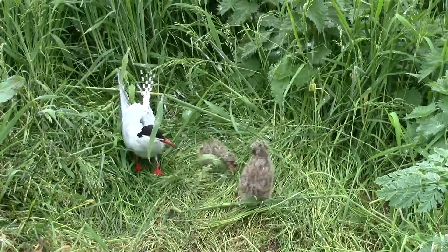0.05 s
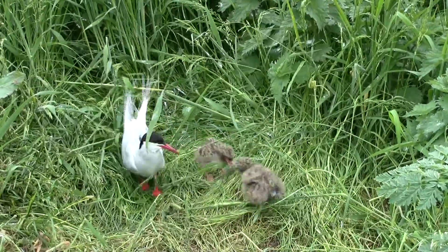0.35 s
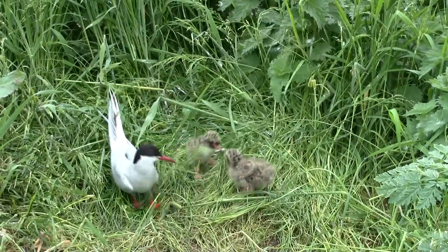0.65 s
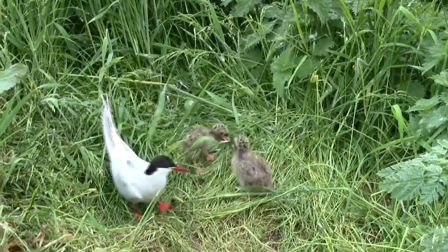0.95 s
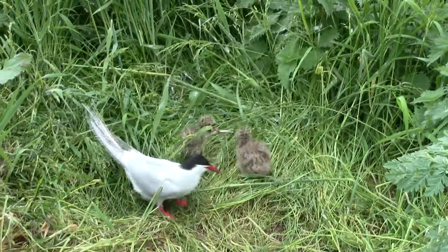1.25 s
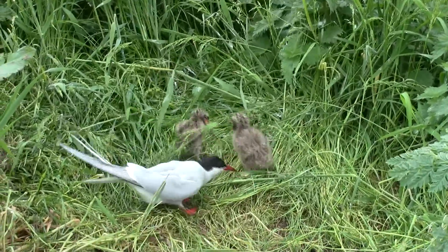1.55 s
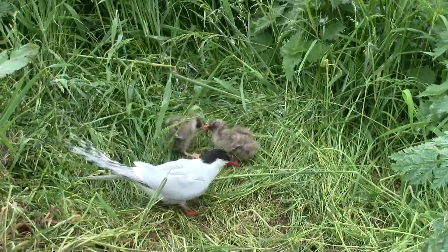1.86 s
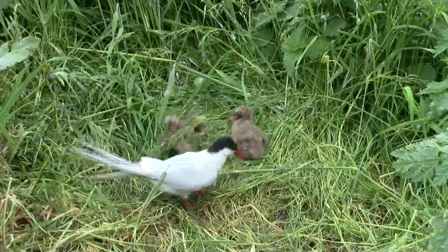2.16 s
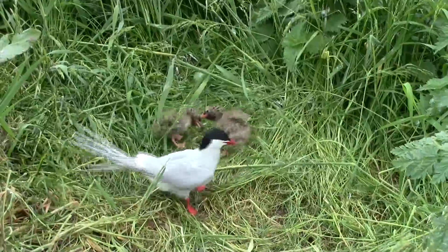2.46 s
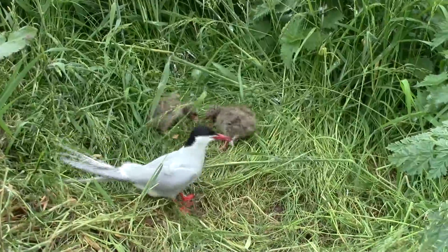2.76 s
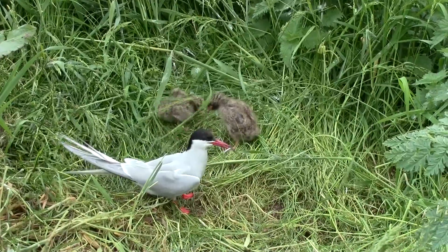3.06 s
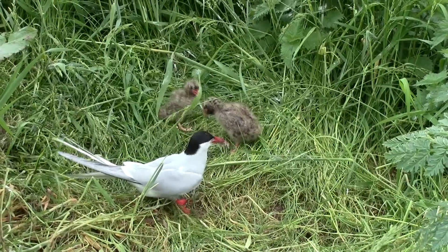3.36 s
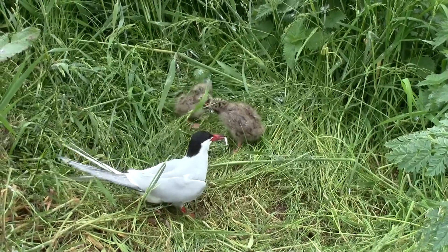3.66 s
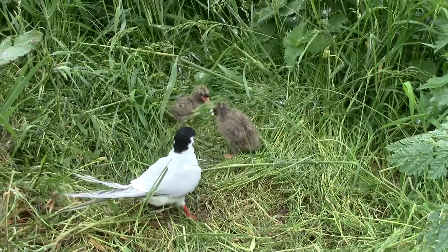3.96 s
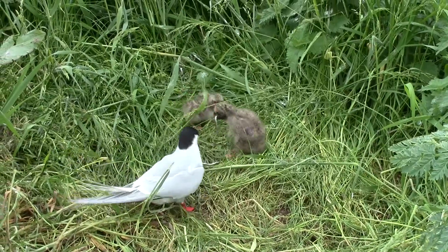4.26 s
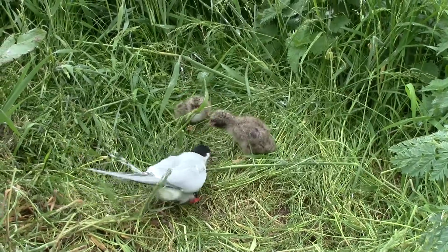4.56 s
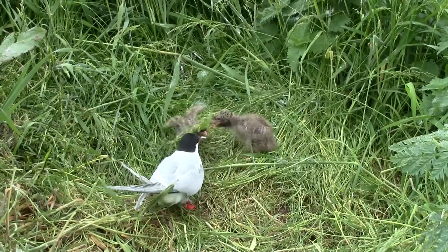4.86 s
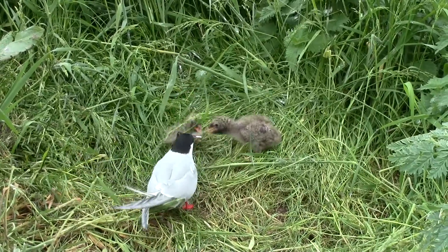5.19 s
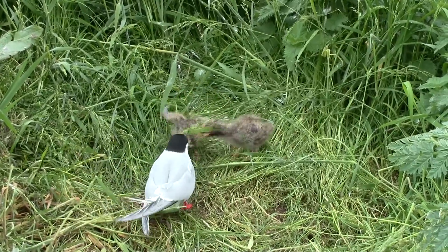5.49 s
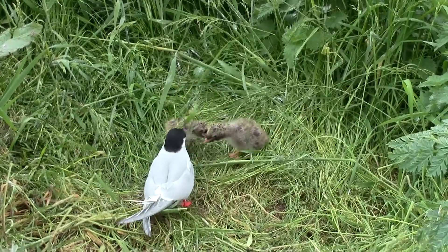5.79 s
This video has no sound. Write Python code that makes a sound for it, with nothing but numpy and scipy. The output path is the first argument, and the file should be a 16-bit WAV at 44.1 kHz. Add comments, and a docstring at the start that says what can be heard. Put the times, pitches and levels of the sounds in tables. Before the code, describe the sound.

A tern calls close to the microphone over the continuous, softer din of a colony, with distant whistles and rasps all around. It opens with a high fluttering cry that breaks into a rasp, then a short churr. A louder cry comes at 0.9 seconds. From 1.3 seconds a soft churr and a quick run of dry clicking notes build to a loud, harsh scream at 1.7 seconds. One more click and faint grass rustles follow, leaving the farther birds. Another loud, shrill cry rings out at 3 seconds, followed by a quieter churr and a slowing string of sharp clicks from 3.7 to 4.3 seconds. A faint low croak and a couple of soft thuds on turf surround a last churr near 4.8 seconds. Grass rustles briefly after 5 seconds as light wind rumble swells on the microphone, and distant calls continue until 6 seconds.

```python
"""A tern calls close to the microphone, standing by its chicks in the grass of a busy colony.
Near birds give fluttering whistles that break into a rasp as the syrinx membranes slap and ring the
throat, and runs of dry 'kek' notes; farther birds call all around. Grass rustles now and then, a light
wind rumbles on the microphone, and the camera's gain control ducks everything under each loud call."""
import sys
import numpy as np
from scipy import signal
from scipy.fft import rfft, irfft, next_fast_len
from scipy.io import wavfile
from scipy.ndimage import uniform_filter1d, minimum_filter1d, map_coordinates

SR = 44100
rng = np.random.default_rng(int(sys.argv[2]) if len(sys.argv) > 2 else 0)


def pcm_store(signal):
    """Save signal as 16-bit PCM."""
    levels = np.round(np.clip(np.atleast_2d(signal), -1, 1) * 32767)
    wavfile.write(sys.argv[1], SR, levels.astype(np.int16).T)


N = 265923

# 'kee' cries close to the microphone: start_s, break_s, rasp_length_s, level_db, flutter_hz, overtone_db
KEE_CRIES = [(0, 0.184, 0.07, -10, 114, 1.5), (0.865, 1.052, .125, -2.5, 115.5, 0.5),
             (3.01, 3.222, .068, -1, 116, 1)]
# the whistle's pitch, one list per cry: time_s, pitch_hz
KEE_TUNES = [
    [(0.0, 3507), (0.04, 3437), (0.05, 3483), (0.128, 3333), (0.138, 3131), (0.15, 3138)],
    [(0.865, 3163), (0.883, 3386), (0.931, 3584), (0.977, 3584), (1.009, 3474), (1.03, 3388)],
    [(3.01, 3060), (3.014, 3224), (3.024, 3317), (3.042, 3405), (3.158, 3457), (3.208, 3243)],
]
def kees(first_depth=.19, last_depth=.7, lead_s=.069, strain_db=-1.5, sink=.2, dying_db=-7):
    """A loud whistle flutters ever deeper and sags until it breaks into a rasp that sinks and dies."""
    track = np.zeros(N)
    for (start_s, break_s, rasp_s, db, flutter_hz, overtone_db), tune in zip(KEE_CRIES, KEE_TUNES):
        t = np.arange(start_s - break_s, rasp_s, 1 / SR)  # zero at the break
        strain = step(t + lead_s, width_s=.061)
        spent = np.clip(t / rasp_s, 0, 1)
        pitch = np.interp(t + break_s, *np.transpose(tune)) * (1 - sink * spent ** 3)
        level = db + strain_db * strain + dying_db * spent ** 4
        depth = first_depth + (last_depth - first_depth) * strain
        rasp = step(t, width_s=.019) + .019 * strain ** 2
        cry = voice(t, pitch, level, flutter_hz, depth, rasp, overtone_db, hoarse_db=.36, waver=.007)
        add(track, start_s, cry)
    return track


# a tern's overtones against its fundamental: frequency_hz, level_db
WHISTLE_OVERTONES = [(4500, -5.5), (6000, -12.5), (7000, -5.5), (7800, -13.5), (9000, -27), (10500, -16.5),
                     (12200, -21.5), (14200, -24), (16000, -49)]
def voice(t, pitch, db, flutter_hz, depth, rasp, overtone_db, hoarse_db, bend=.0249, waver=.0095):
    """One call: a whistle blended with rasp and chopped by a flutter, with one beat on t = 0."""
    depth, rasp, size = np.clip(depth, 0, 1), np.clip(rasp, 0, 1), len(t)
    beats = np.cumsum(flutter_hz * np.ones(size)) / SR
    flutter = np.cos(2 * np.pi * (beats - np.interp(0, t, beats)))
    gate = 1 - depth / (1 + np.exp(5 * flutter + .7))
    gate *= amp(.7 * wobble(90, size)) / np.sqrt(1 - depth / 2)
    swing = bend * np.sqrt(depth) * (flutter - depth / 2)  # the pitch swings with every beat
    hz = pitch * (1 + swing + waver * wobble(636, size))
    phase = 2 * np.pi * np.cumsum(hz) / SR
    overtones = sum(amp(along(WHISTLE_OVERTONES, k * hz) + overtone_db) * np.sin(k * phase)
                    for k in range(2, 6))
    whistle = (np.sin(phase) + overtones) * amp(hoarse_db * wobble(2200, size))
    harsh = throat_rasp(pitch, phase, flutter_hz, rasp)
    hiss = amp(-35) * noise(BRIGHT_THROAT, size)
    sound = np.sqrt(1 - rasp) * unit(whistle) + np.sqrt(rasp) * harsh + hiss
    fade = np.clip(np.minimum(t - t[0], t[-1] - t) / .0033, 0, 1)
    return amp(db) * gate * fade * sound


# the throat's colour in a screech and in a growl: frequency_hz, level_db
BRIGHT_THROAT = [(180, -99), (300, -89), (537, -31), (814, -21.5), (1100, -32.5), (1780, -14.5),
                 (2400, -14), (3290, -2.5), (4370, 0), (6000, -13.5), (6520, -5), (7440, -23.5),
                 (8790, -22.5), (13500, -24.5), (16000, -95)]
DARK_THROAT = [(300, -42), (700, -19), (1200, -19), (2250, -1), (3200, -5), (4300, -8), (6000, -21),
               (8000, -31), (12000, -35), (16000, -48)]
def throat_rasp(pitch, phase, flutter_hz, rasp, dark_hz=2850, bright_hz=3250, ring_s=.0025):
    """High, fast calls slap chaotically; low or slow ones settle on every fourth cycle and darken."""
    high = np.clip((pitch - dark_hz) / (bright_hz - dark_hz), 0, 1)
    fast = np.clip(flutter_hz / 50 - 1.4, 0, 1)
    bright = np.maximum(high * fast, 1 - 1.4 * rasp)  # a mere trace of rasp is always ragged
    slaps = syrinx(pitch / 4, jitter=.05 + .17 * bright, scatter_db=1 + bright, grit=.15 + .6 * bright)
    screech = unit(signal.fftconvolve(slaps, ring(BRIGHT_THROAT))[:len(pitch)])
    growl = unit(signal.fftconvolve(slaps, ring(DARK_THROAT))[:len(pitch)])
    throat = unit(bright * screech + (1 - bright) * growl)
    # every slap also rings briefly at the whistle's own pitch
    pole = np.exp(-1 / (SR * ring_s))
    ringing = signal.lfilter([1], [1, -2 * pole, pole ** 2], slaps * np.exp(-1j * phase))
    tuned = unit((np.exp(1j * phase) * ringing).imag)
    return unit(throat + .4 * (2 - bright) * tuned)


def syrinx(rate_hz, jitter, scatter_db, grit=.6, puff_s=.0005):
    """Uneven slaps of the syrinx membranes, each with a short puff of air; the first comes at once."""
    size = len(rate_hz)
    cycles = np.floor(np.cumsum(rate_hz * np.exp(jitter * wobble(600, size))) / SR)
    slaps = (np.diff(cycles, prepend=-1) > 0) * amp(scatter_db * rng.standard_normal(size))
    puff = np.exp(-np.arange(SR // 300) / (SR * puff_s))
    breath = np.convolve(slaps, puff / np.linalg.norm(puff))[:size] * rng.standard_normal(size)
    return slaps + grit * breath


# churrs near the microphone: start_s, break_s, rasp_length_s, first_hz, last_hz,
# level_db, swell_db, overtone_db, hoarse_db, early_rasp_share
CHURR_CALLS = [(.243, .405, 0.054, 3138, 3002, -11.5, 0.5, 2, 2, 0.09),
               (1.265, 1.464, 0.013, 2912, 2974, -21, 2, -0.5, 2, 0),
               (3.415, 3.602, 0.076, 2818, 2986, -25, 7.5, 2, 1.5, .12),
               (4.738, 4.928, 0.08, 2781, 2874, -15.5, -2.5, -13.5, 1.5, 0)]
def churrs(final_flutter_hz=69, quickening_hz_per_s=104, growl_db=1.5, opening_db=2, dying_db=-7):
    """A smooth note scoops up, is chopped into quickening beats and ends in a low, falling growl."""
    track = np.zeros(N)
    for start_s, break_s, rasp_s, first_hz, last_hz, db, swell_db, *timbre in CHURR_CALLS:
        overtone_db, hoarse_db, early_rasp = timbre
        t = np.arange(start_s - break_s, rasp_s, 1 / SR)  # zero at the break
        age = t - t[0]
        progress = np.minimum(age / (break_s - start_s), 1)
        chopped = step(age - .0352, width_s=.0094)
        scoop = 1 - .14 * np.exp(-age / .008)
        sink = 1 - .22 * np.clip(t / .039, 0, 1) ** 1.9
        pitch = (first_hz + (last_hz - first_hz) * progress) * scoop * sink
        level = db + opening_db * (1 - chopped) + swell_db * progress
        level += growl_db * step(t, width_s=.008) + dying_db * np.clip(t / rasp_s, 0, 1) ** 4
        flutter_hz = final_flutter_hz + quickening_hz_per_s * np.minimum(t, 0)
        rasp = early_rasp * (1 - progress ** 2) + step(t + .007, width_s=.009)
        add(track, start_s, voice(t, pitch, level, flutter_hz, .97 * chopped, rasp, overtone_db, hoarse_db))
    return track


# a scream at close range: start_s, length_s, pitch_hz, level_db, flutter_hz
CLOSE_SCREAM = (1.676, .274, 3550, 1.8, 150)
def scream():
    """One harsh arch, all rasp and no whistle."""
    track = np.zeros(N)
    start_s, length_s, pitch_hz, db, flutter_hz = CLOSE_SCREAM
    t, pitch, level = arched(length_s, pitch_hz, glide_hz=-79.5, arch_hz=504.5, db=db, ends_db=-5)
    add(track, start_s, voice(t, pitch, level, flutter_hz, depth=.69, rasp=1, overtone_db=0, hoarse_db=0))
    return track


# dry 'kek' notes near the microphone: start_s, peak_db, throat_hz, decay_s
KEK_NOTES = [(1.308, 4, 2790, 0.012), (1.386, 4.5, 3150, 0.014), (1.471, 3, 4730, 0.016),
             (1.557, 9.5, 4640, 0.015), (1.643, 18, 4110, 0.011), (1.655, 16.5, 3900, 0.017),
             (2.069, 6, 4130, 0.0097), (3.709, 8, 4460, 0.013), (3.7903, 1, 1840, 0.0042),
             (3.798, 15.5, 3730, 0.011), (3.869, 13, 4850, 0.011), (3.9591, 11.5, 5170, 0.012),
             (4.053, 10, 3200, 0.013), (4.1694, 8.5, 3590, 0.016), (4.294, 7, 2240, 0.02)]
# the throat's colour as a kek opens: frequency_hz, level_db
KEK_THROAT = [(200, -21), (530, -17), (2300, -3), (3020, 2.5), (4600, 2.5), (6760, -3.5), (7830, -14),
              (14900, -27.5), (16000, -15.5)]
def keks(slap_hz=590, slowing_s=.032, closing_s=.044):
    """Each kek is a handful of hard slaps that slow down, darken and die away."""
    track, t = np.zeros(N), np.arange(SR // 25) / SR
    dark = np.clip(t / closing_s, 0, 1) ** 2
    for start_s, peak_db, throat_hz, decay_s in KEK_NOTES:
        slaps = syrinx(slap_hz / (1 + t / slowing_s), jitter=.14, scatter_db=1.8, grit=.45)
        slaps /= 1 + (t / decay_s) ** 4
        throat = ring(KEK_THROAT, throat_hz, peak_db=8, width_hz=170)
        note = -signal.fftconvolve(slaps * (1 - dark), throat) - low_throat(slaps * dark)
        add(track, start_s, amp(peak_db) * note / abs(note).max())
    return track


# a low, creaky croak nearby: start_s, length_s, level_db, slap_hz
LOW_CROAKS = [(4.368, 0.044, -29.5, 210)]
def croaks():
    """A slow train of slaps swells and fades in the throat."""
    track = np.zeros(N)
    for start_s, length_s, db, slap_hz in LOW_CROAKS:
        swell = signal.windows.tukey(round(length_s * SR))
        slaps = syrinx(np.full(len(swell), slap_hz), jitter=.036, scatter_db=-3)
        add(track, start_s, amp(db) * unit(low_throat(swell * slaps)))
    return track


def low_throat(slaps):
    """Slaps ring the throat with a dark colour, strongest at 750 Hz."""
    colour = [(200, -5), (380, 0), (750, 11.5), (1700, 4), (3500, 0), (7000, -25), (16000, -16)]
    return signal.fftconvolve(slaps, ring(colour))


# terns farther off in the colony: start_s, length_s, pitch_hz, glide_hz, level_db, rasp_share
FAR_CALLS = [(0.439, .2, 3278, -200, -25, 0.93), (0.648, 0.29, 3840, 248, -24.5, 0.39),
             (0.691, 0.21, 3146, -450, -23.5, 0.2), (1.029, 0.1, 1864, -200, -21, 0.03),
             (1.951, 0.2, 2900, -500, -28, 0.06), (2.099, 0.24, 3117, 2.5, -36, 0.98),
             (2.275, 0.15, 3465, -250, -31.5, 0.31), (2.472, 0.2, 3800, 602, -26, 0.24),
             (2.579, 0.23, 3296, -150, -23.5, 0.97), (2.78, 0.28, 3296, -300, -27.5, 0.39),
             (3.411, 0.18, 3510, -0.5, -27.5, .95), (3.893, 0.18, 2950, -450, -25.5, 0),
             (4.2, 0.3, 3160, -400, -28, .2), (4.316, .15, 3733, 99, -19, 0.04),
             (4.492, 0.32, 3500, -250, -28, 0.21), (4.982, 0.26, 3512, -46, -23.5, .3),
             (4.977, .16, 2210, -150, -27, 0), (5.122, 0.13, 2424, -1100, -26, 1),
             (5.203, 0.2, 3256, -500, -22.5, 0.07), (5.607, .19, 3513, 104, -26, 0.08),
             (5.688, 0.071, 2600, -2, -30, 0), (5.802, 0.097, 3100, -200, -26, 0.29),
             (5.932, 0.12, 3047, 294, -21.5, 0.08)]
def far_terns(clean_flutter_hz=58, rasp_adds_hz=52):
    """Each call arches and glides; the raspier, the faster it flutters. Distance dulls its overtones."""
    track = np.zeros(N)
    for start_s, length_s, pitch_hz, glide_hz, db, rasp in FAR_CALLS:
        t, pitch, level = arched(length_s, pitch_hz, glide_hz, arch_hz=171.3, db=db, ends_db=-2.5)
        flutter_hz = (clean_flutter_hz + rasp_adds_hz * rasp) * (1 + .059 * wobble(40, len(t)))
        call = voice(t, pitch, level, flutter_hz, depth=.773, rasp=rasp, overtone_db=-7.5, hoarse_db=-.5)
        add(track, start_s, call)
    return track


# short scratchy noises, a touch to the left: start_s, length_s, level_db
SCRATCHES = [(1.487, 0.048, -31.5), (1.596, 0.19, -26), (2.021, 0.24, -24.5), (4.016, 0.15, -23),
             (5.148, 0.041, -22), (5.253, 0.024, -23), (5.283, 0.046, -20), (5.4, 0.064, -19)]
# their colour: frequency_hz, level_db
SCRATCH_COLOUR = [(500, -20), (3500, -1), (6300, 6), (9500, -8.5), (16000, -38)]
def scratches(clump_db=3.5):
    """Bright noise in quick clumps: grass rustles, and a tern's rasp at 4.0 s."""
    track = np.zeros(N)
    for start_s, length_s, db in SCRATCHES:
        size = round(length_s * SR)
        scratch = unit(noise(SCRATCH_COLOUR, size) * amp(clump_db * wobble(265, size)))
        add(track, start_s, amp(db) * scratch * signal.windows.tukey(size, .25))
    return track


# soft thuds on the ground: start_s, level_db
TURF_THUDS = [(2.349, -38), (4.415, -34), (4.809, -34)]
def turf(rise_s=.0072):
    """The turf thuds with a dull burst of noise that rises quickly and dies."""
    track = np.zeros(N)
    rise = np.arange(SR // 8) / SR / rise_s
    for start_s, db in TURF_THUDS:
        dull = noise([(80, -3), (400, 26), (900, 4), (3000, -66)], len(rise))
        add(track, start_s, amp(db) * rise * np.exp(1 - rise) * dull)
    return track


# the din of the colony all around: time_s, level_db
DIN_LEVEL = [(0, -24), (.85, -25.5), (1.3, -33), (2.4, -26.5), (3.8, -30.5), (4.4, -22.5), (5.2, -25),
             (6.03, -28.5)]
# the colour of its merged cries: frequency_hz, level_db
DIN_COLOUR = [(150, -23.5), (700, -14), (1500, -11), (2300, -4.5), (3100, 4), (4300, -7), (6500, -17.5),
              (16000, -42.5)]
def colony(blur_db=-1.5, treble_width=.28):
    """The cries of the whole colony blur into a flickering noise, with distant whistles among them."""
    cries = noise(DIN_COLOUR, N) + treble_width * np.gradient(noise(DIN_COLOUR, N)) * [[1], [-1]]
    blur = unit(cries * amp(3.16 * wobble(14, N) + 1.4 * wobble(150, N)))
    din_db = np.interp(np.arange(N) / SR, *np.transpose(DIN_LEVEL))
    return amp(din_db) * (amp(blur_db) * blur + distant_terns())


def distant_terns(count=45, pitch_hz=3200, glide_hz=-300, flutter_hz=70, octave_db=-17):
    """The most distant terns call at random: only their fluttering whistles carry."""
    track = np.zeros(N)
    starts_s = rng.uniform(0, N / SR, count)
    for start_s, (long, high, glide, loud, fast) in zip(starts_s, rng.standard_normal((count, 5))):
        t, pitch, level = arched(.2 * np.exp(.25 * long), pitch_hz * np.exp(.11 * high),
                                 glide_hz * (1 + glide), arch_hz=200.2, db=-6.5 + 2 * loud, ends_db=-10)
        phase = 2 * np.pi * np.cumsum(pitch * (1 + .011 * wobble(490, len(t)))) / SR
        whistle = np.sin(phase) + amp(octave_db) * np.sin(2 * phase)
        flutter = 1 + .59 * np.cos(2 * np.pi * flutter_hz * np.exp(.188 * fast) * t)
        add(track, start_s, amp(level) * signal.windows.tukey(len(t)) * flutter * whistle)
    return track


# gusts at the microphone, and dips where the rumble stays ducked around loud calls:
# middle_s, half_length_s, change_db
GUSTS_AND_DIPS = [(1.6, 0.46, -7), (2.23, 0.16, 9.5), (3.697, 0.39, -5.5), (4.42, .12, 3.5),
                  (5.27, 0.18, 13.5), (5.75, 0.077, 12.5)]
# the colour of the rumble: frequency_hz, level_db
WIND_COLOUR = [(20, -6.5), (62, -2.5), (160, -14), (300, -29.5), (800, -39.5), (2500, -80)]
def wind(breeze_db=-39):
    """A light wind pushes the microphone ports against each other and buffets each on its own."""
    t = np.arange(N) / SR
    change_db = sum(db * np.exp(-((t - mid_s) / half_s) ** 2) for mid_s, half_s, db in GUSTS_AND_DIPS)
    opposed = noise(WIND_COLOUR, N) * [[1], [-1]]
    separate = np.array([noise(WIND_COLOUR, N), noise(WIND_COLOUR, N)])
    return amp(breeze_db + change_db) * unit(opposed + separate) * amp(1.9 * wobble(28, N))


# how long sound lingers in the meadow: frequency_hz, t60_s
MEADOW_DECAY = [(300, 0.017), (3000, 0.29), (12000, 0.11)]
def meadow(sound):
    """Faint scatter from the plants and the ground, slightly different on each side."""
    hz, t, spectra = signal.stft(rng.standard_normal((2, SR // 3)), SR, nperseg=256)
    decay = amp(-60 * t / along(MEADOW_DECAY, hz)[:, None])
    mid, side = signal.istft(spectra * decay, SR, nperseg=256)[1]
    tail = mid + .4 * side * np.array([[1], [-1]])
    return signal.fftconvolve(sound[None], tail / np.linalg.norm(tail[0]), axes=1)[:, :N]


def gain_control(sound, limit_db=-7.2, sense_s=.00084, attack_s=.00074, hold_s=.022, climb_db_per_s=76.5):
    """A level over the limit turns everything down quickly; the gain holds, then climbs back steadily."""
    power = abs(uniform_filter1d(np.mean(sound ** 2, axis=0), **trailing(sense_s)))
    over_db = np.maximum(10 * np.log10(power + 1e-12) - limit_db, 0)
    held_db = -minimum_filter1d(-over_db, **trailing(hold_s))
    climb_db = climb_db_per_s * np.arange(N) / SR
    cut_db = np.maximum.accumulate(held_db + climb_db) - climb_db
    return sound * amp(-uniform_filter1d(cut_db, round(attack_s * SR)))


def trailing(length_s):
    """Size and origin of a running window that looks back only."""
    size = max(round(length_s * SR), 1)
    return dict(size=size, origin=(size - 1) // 2)


def arched(length_s, pitch_hz, glide_hz, arch_hz, db, ends_db):
    """Time, pitch and level of a gliding call that droops in pitch and level at both ends."""
    t = np.arange(0, length_s, 1 / SR)
    position = 2 * t / length_s - 1
    pitch = pitch_hz + glide_hz * position / 2 - arch_hz * position ** 2
    return t, pitch, db + ends_db * position ** 4


def ring(colour, peak_hz=3000, peak_db=0, width_hz=300, size=1024):
    """Minimum-phase impulse response of energy 1 with this colour and an optional resonance."""
    hz = abs(np.fft.fftfreq(size, 1 / SR))
    db = along(colour, hz) + peak_db / (1 + ((hz - peak_hz) / width_hz) ** 2)
    cepstrum = np.fft.ifft(np.log(amp(np.maximum(db, -70)))).real
    cepstrum[1:size // 2] *= 2
    cepstrum[size // 2 + 1:] = 0
    response = np.fft.ifft(np.exp(np.fft.fft(cepstrum))).real
    return response / np.linalg.norm(response)


def noise(colour, size):
    """Coloured noise of rms 1."""
    padded = next_fast_len(size + 2048)
    gain = amp(along(colour, np.fft.rfftfreq(padded, 1 / SR)))
    return unit(irfft(rfft(rng.standard_normal(padded)) * gain, padded)[:size])


def wobble(rate_hz, size):
    """A smooth random curve with rate_hz knots a second."""
    knots = rng.standard_normal(int(size * rate_hz / SR) + 4)
    return map_coordinates(knots, [np.arange(size) * rate_hz / SR])


def along(points, hz):
    """Read (frequency_hz, value) points on a log frequency axis."""
    points_hz, values = np.transpose(points)
    return np.interp(np.log(hz + 1), np.log(points_hz + 1), values)


def step(t, width_s):
    """A smooth rise from 0 to 1 around t = 0."""
    return .5 + .5 * np.tanh(t / width_s)


def amp(db):
    """Decibels to gain."""
    return 10 ** (np.asarray(db) / 20)


def unit(sound):
    """Scale to rms 1."""
    return sound / np.sqrt(np.mean(sound ** 2) + 1e-20)


def add(track, start_s, sound):
    """Mix a sound into the track at start_s."""
    start = max(round(start_s * SR), 0)
    span = track[start:start + len(sound)]
    span += sound[:len(span)]


def scene():
    """At the microphone the near birds are dry; farther ones, scratches and thuds are more diffuse."""
    near = kees() + churrs() + scream() + keks() + croaks()
    far = far_terns()
    noises = scratches() + turf()
    direct = near * amp([[-.2], [.2]]) + far + noises * amp([[.5], [-.5]])
    treble_spread = .13 * np.gradient(near + far) * [[1], [-1]]
    scatter = meadow(amp(-27) * near + amp(-11) * far + amp(-10) * noises)
    return direct + treble_spread + scatter + colony() + wind()


def record(dry, top_hz=16000):
    """The camera ducks loud calls, rounds off the highest peaks and keeps nothing above top_hz."""
    ducked = gain_control(dry)
    rounded = ducked / (1 + abs(ducked) ** 8) ** (1 / 8)
    padded = next_fast_len(N + SR // 4)
    in_band = np.fft.rfftfreq(padded, 1 / SR) < top_hz
    return irfft(rfft(rounded, padded) * in_band, padded)[:, :N]


dry = scene()
out = record(dry)
pcm_store(out)
```